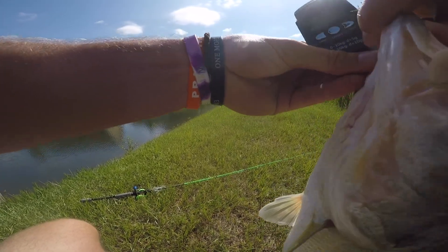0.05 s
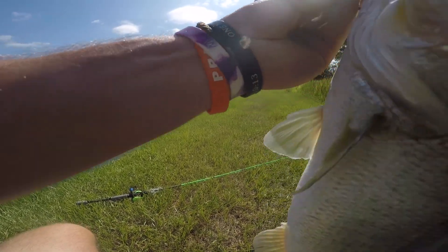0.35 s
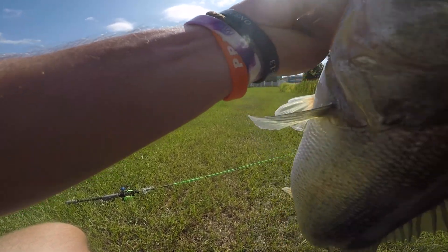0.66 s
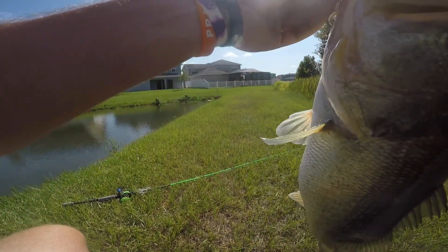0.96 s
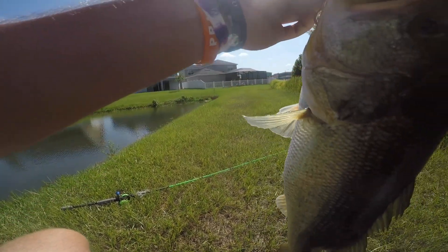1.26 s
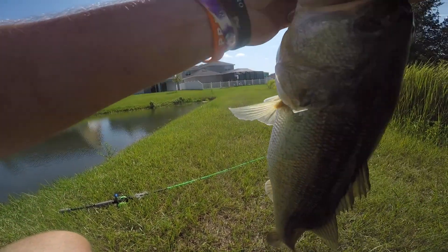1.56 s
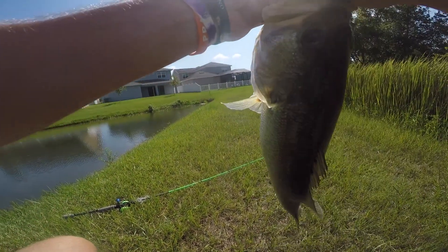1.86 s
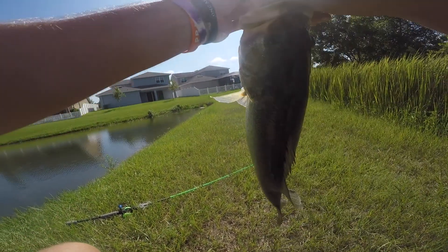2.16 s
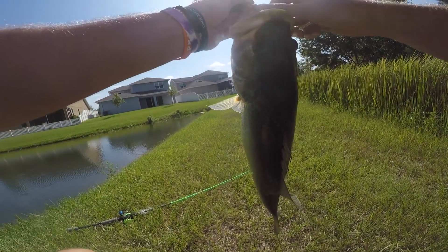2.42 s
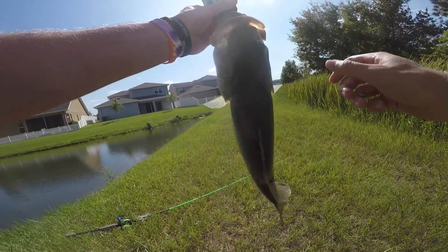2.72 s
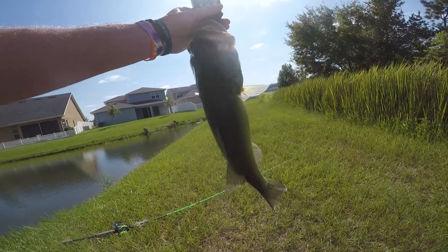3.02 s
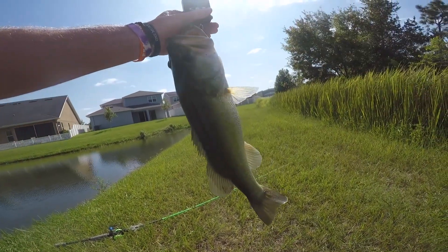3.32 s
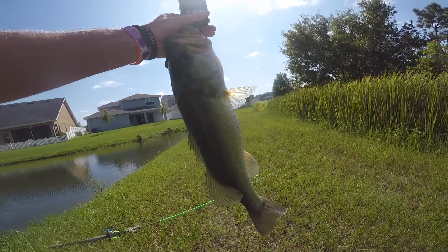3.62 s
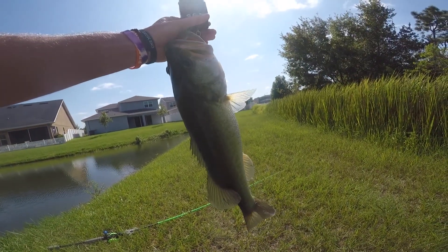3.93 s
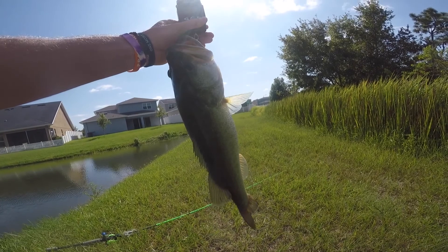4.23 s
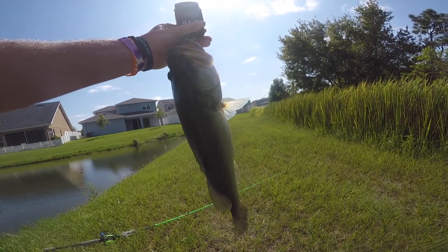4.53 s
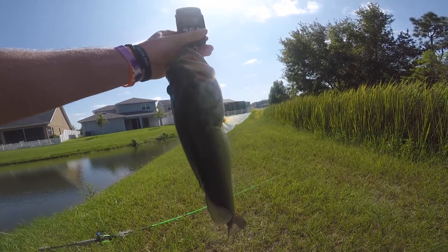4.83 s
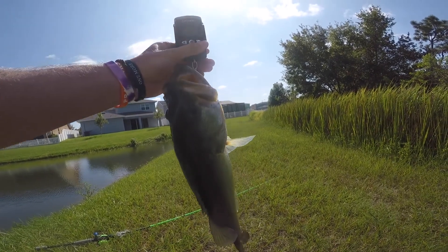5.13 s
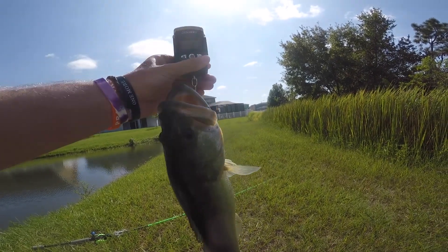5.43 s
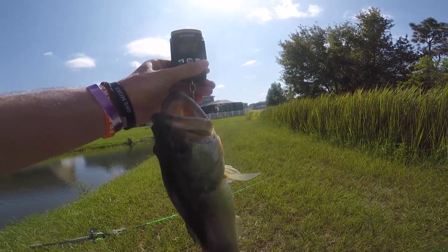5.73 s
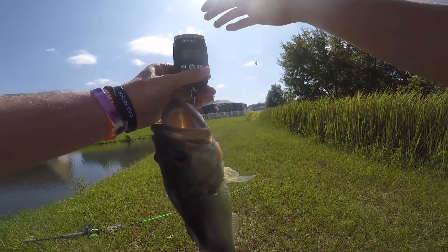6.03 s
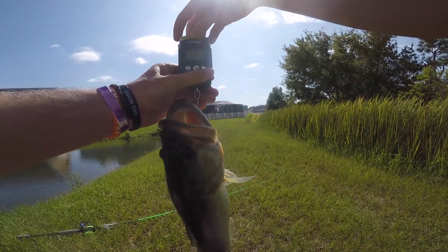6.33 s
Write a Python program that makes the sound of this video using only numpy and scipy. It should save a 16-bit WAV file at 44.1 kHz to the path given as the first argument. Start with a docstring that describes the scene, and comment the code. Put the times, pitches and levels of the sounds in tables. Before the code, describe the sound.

A heartbeat thuds close over low outdoor rumble and hum, with small clicks, strap rubbing, a faint calling bird and one loud bump.

```python
"""Beside a pond, an angler holds out a bass on a hand scale, heard from a camera strapped to the chest.
Heartbeats drive the resonances of the harness, whose straps rub as the arms move; bumps ring the case.
The hook and the wet fish click, and the hook clinks once. Behind lie a low rumble, the hum of air
conditioners at the houses, insects in the reeds and a bird calling in gliding tones."""
import sys
import numpy as np
from scipy import signal
from scipy.fft import rfft, irfft
from scipy.io import wavfile
from scipy.ndimage import uniform_filter1d, minimum_filter1d, map_coordinates

SR = 44100
rng = np.random.default_rng(int(sys.argv[2]) if len(sys.argv) > 2 else 0)


def transcribe(signal):
    """Save signal, clipped to [-1, 1], as a 16-bit WAV file at the path in sys.argv[1]."""
    frames = np.atleast_2d(signal).T
    limited = np.clip(frames, -1, 1)
    pcm = np.round(limited * 32767).astype(np.int16)
    wavfile.write(sys.argv[1], SR, pcm)


N = 285327


def from_db(db):
    """Decibels as an amplitude ratio."""
    return 10 ** (np.asarray(db) / 20)


def rms_one(x):
    """Normalisation to unit rms."""
    return x / np.sqrt(np.mean(x ** 2) + 1e-20)


def at_hz(points, hz):
    """Interpolation on a logarithmic frequency axis."""
    point_hz, values = np.transpose(points)
    return np.interp(np.log(hz + 1e-9), np.log(point_hz), values)


def panned(balance_db):
    """A level difference, left minus right, split between the two microphone ports."""
    return from_db(np.array([[.5], [-.5]]) * balance_db)


def add(out, start_s, sound):
    """Superposition of a stereo sound from a given time."""
    i = max(0, round(start_s * SR))
    out[:, i:i + sound.shape[1]] += sound[:, :out.shape[1] - i]


def drift(per_s):
    """Smooth random modulation of unit rms."""
    knots = rng.standard_normal(2000)
    return rms_one(map_coordinates(knots, [np.arange(N) / SR * per_s], order=2, mode="wrap"))


def noise(colour, channels=1):
    """White noise shaped to a spectral density in dB, fading out below 20 Hz."""
    hz = np.arange(N // 2 + 1) * SR / N
    gain = from_db(at_hz(colour, hz)) * np.sqrt(SR / 2) * np.clip(hz / 10 - 1, 0, 1)
    return irfft(rfft(rng.standard_normal((channels, N))) * gain, N)


def band(x, low_hz, high_hz):
    """A band-pass filter with gentle slopes."""
    return signal.sosfilt(signal.butter(2, [low_hz, high_hz], "band", fs=SR, output="sos"), x)


def decay(t, t60):
    """Exponential damping by 60 dB in t60 seconds."""
    return np.exp(-np.log(1000) * t / t60)


def ring(t, hz, t60, rise_cycles):
    """Free vibration of a damped mode after a soft push at t = 0."""
    t = np.maximum(t, 0)
    return np.sin(2 * np.pi * hz * t) * decay(t, t60) * (1 - np.exp(-(hz * t / rise_cycles) ** 2))


def air(swell_db=1.63):
    """Partial coherence: distant rumble is partly alike at the ports; a faint wash is in antiphase."""
    # Each row of both: frequency in Hz, spectral density in dB.
    rumble_colour = [(20, -32), (35, -42), (60, -44.5), (85, -46.5), (130, -57.5), (220, -66.5),
                     (320, -71.5), (450, -82), (650, -86), (1200, -93.5), (1800, -94.5), (2500, -101),
                     (4300, -96), (12000, -110)]
    wash_colour = [(200, -87), (450, -79.5), (650, -79.5), (860, -77), (1200, -94), (1650, -91),
                   (2050, -104), (3000, -102), (5000, -112)]
    # Each row: frequency in Hz, share of power common to both ports.
    coherence = [(30, 0), (70, 0.21), (140, 0.7), (400, 0.43)]
    # Each row: frequency in Hz, left minus right in dB.
    balance = [(20, 4.5), (45, 2.5), (130, -6), (300, -7.5), (450, -5), (800, -7.5), (14000, 3)]
    hz = np.arange(N // 2 + 1) * SR / N
    spectra = rfft(noise(rumble_colour, channels=3))
    alike = at_hz(coherence, hz)
    pair = np.sqrt(1 - alike) * spectra[:2] + np.sqrt(alike) * spectra[2]
    rumble = irfft(pair * panned(at_hz(balance, hz)), N)
    return rumble * from_db(swell_db * drift(8.5)) + noise(wash_colour) * [[1], [-1]]


def hum(waver_db=2.0, wander_rad=0.62):
    """Moving air modulates the amplitude and phase of compressor and fan tones from across the pond."""
    # Each row: frequency in Hz, left and right levels in dB.
    motor_tones = [(78.97, -34.5, -32.5), (118.14, -41, -39.5), (235.3, -56, -50), (240.9, -55.5, -40.5),
                   (346.5, -88, -49), (403.1, -82, -51)]
    t = np.arange(N) / SR
    out = np.zeros((2, N))
    for hz, left_db, right_db in motor_tones:
        amplitude = np.sqrt(2) * from_db([[left_db], [right_db]]) * from_db(waver_db * drift(5))
        out += amplitude * np.sin(2 * np.pi * hz * t + wander_rad * drift(4))
    return out


def insects(level_db=-5, shimmer_db=4.5, count=36, song_waver_db=1.5, song_wander_rad=.8):
    """Incoherent addition: a far chorus merges into hiss and thin tones; nearer singers stand out."""
    # Each row: frequency in Hz, relative spectral density in dB.
    chorus_colour = [(3000, -110), (4500, -100.5), (5400, -89.5), (6300, -88), (7600, -90), (8500, -92.5),
                     (10300, -95.5), (11400, -106), (12200, -102), (13500, -108), (15000, -120)]
    # Each row of both: time in seconds, relative level in dB.
    hiss_levels = [(0, 1), (1.1, 0.5), (2.2, 0), (3.1, 1), (4.1, 0.8), (5, 0), (6.47, -0.5)]
    tone_levels = [(0, -76), (1, -72.5), (2.2, -73), (3.1, -70.5), (4.3, -73.5), (5.3, -78), (6.47, -79)]
    # Each row: start and length in seconds, pitch in Hz, relative level in dB.
    songs = [(.1, 1.2, 6901, -72), (.5, 1.1, 4694, -76), (.4, 2.6, 7445, -72), (.7, 2, 7730, -75.5),
             (2.4, 1.6, 6342, -70), (2.2, 3, 6085, -69.5)]
    t = np.arange(N) / SR
    wander = np.array([drift(10) for _ in range(5)])
    swells = [from_db(shimmer_db * drift(1.64)) for _ in range(7)]
    pitches = np.linspace(5300, 8300, count) + rng.normal(0, 30, count)
    colour_db = at_hz(chorus_colour, pitches)
    colour_db -= colour_db.max()
    tones = np.zeros((2, N))
    for k, hz in enumerate(pitches):
        amplitude = from_db(colour_db[k] + rng.normal(0, 1, (2, 1))) * swells[k % 7]
        tones += amplitude * np.sin(2 * np.pi * hz * t + .5 * rng.standard_normal(5) @ wander)
    tones *= from_db(np.interp(t, *np.transpose(tone_levels)))
    hiss = from_db(np.interp(t, *np.transpose(hiss_levels))) * noise(chorus_colour, channels=2)
    out = from_db(level_db) * (hiss + tones)
    for s, length_s, hz, song_db in songs:
        amplitude = from_db(song_db + song_waver_db * drift(7.9))
        song = amplitude * np.sin(2 * np.pi * hz * t + song_wander_rad * drift(20))
        swell = signal.windows.tukey(int(length_s * SR), .5)
        add(out, s, swell * song[:len(swell)] * np.ones((2, 1)))
    return out * panned(-6.5)


def strap_motion(creep_db=-53):
    """Powers add: the straps' steady creep plus a bell-shaped swell for each arm stroke."""
    # Each row: time of the peak in seconds, relative level in dB, half length in seconds.
    strokes = [(0.267, -49, 0.1), (0.431, -50, 0.0072), (0.432, -34.5, 0.038), (0.53, -46, 0.045),
               (0.747, -54, 0.022), (1.708, -44, 0.22), (1.833, -37, 0.021), (2.006, -46.5, 0.048),
               (2.863, -44, 0.049), (3.09, -44.5, 0.16), (6.035, -43.5, 0.21), (6.107, -38.5, 0.023),
               (6.42, -47, 0.031)]
    t = np.arange(N) / SR
    stroke_power = sum(from_db(db) ** 2 * np.exp(-2 * np.minimum(np.abs(t - s) / half_s, 10) ** 2)
                       for s, db, half_s in strokes)
    return np.sqrt(from_db(creep_db) ** 2 + stroke_power)


def rubbing(case_db=-25.5, cloth_db=-28.0, hollow_db=-25, catch_db=1.0, flicker_db=3.0):
    """Stick-slip friction of straps on cloth excites the case's hollows and the ports in antiphase."""
    # Sound borne by the case and by the air. Each row: frequency in Hz, relative density in dB.
    case_colour = [(40, 0), (160, 7.5), (230, 7), (320, -1), (450, -9), (680, -15), (860, -2), (980, -8),
                   (1180, -.5), (1650, -15.5), (1930, -6), (2600, -21), (3300, -30), (6000, -48.5)]
    cloth_colour = [(50, 8), (130, 6), (190, 9), (300, 6), (420, -11), (700, -16), (860, -19.5), (980, -19),
                    (1150, -16), (1800, -25), (2500, -21), (3000, -25.5), (3650, -23.5), (4600, -35),
                    (9000, -51.5)]
    # Each row: resonance and bandwidth in Hz, relative density in dB.
    hollows = [(849, 62, -9.5), (1080, 110, -10.5), (1450, 110, -14), (1900, 120, -16), (2480, 210, -10.5),
               (3520, 260, -20.5)]
    effort = strap_motion() * from_db(catch_db * drift(per_s=130))
    case = from_db(case_db) * noise(case_colour) * [[1], [-1]]
    friction = rng.standard_normal(N) * np.sqrt(SR / 2)
    hollow = np.zeros(N)
    for hz, width_hz, db in hollows:
        drive = band(friction, hz / 1.3, hz * 1.3)
        resonance = signal.lfilter(*signal.iirpeak(hz, hz / width_hz, fs=SR), drive)
        hollow += from_db(db + flicker_db * drift(per_s=45)) * resonance
    cloth = from_db(cloth_db) * noise(cloth_colour)
    return effort * (case + cloth + from_db(hollow_db) * hollow)


def wobble(count):
    """Quick random modulation within a note."""
    return map_coordinates(rng.standard_normal(64), [np.arange(count) / SR * 200], order=2, mode="wrap")


def note(hz, jitter=0.01, shimmer_db=2.5):
    """Phase is the integral of frequency; pitch sets the level and phase differences at the ports."""
    # Each row: frequency in Hz, left minus right in dB, left phase lead in radians.
    ports = [(1940, -10.5, 3.96), (2720, -1, 1.06), (3500, -1.5, 1.7)]
    port_hz, balance_db, lead = np.transpose(ports)
    phase = 2 * np.pi * np.cumsum(hz * (1 + jitter * wobble(len(hz)))) / SR
    pair = np.sin([phase + np.interp(hz, port_hz, lead), phase])
    return from_db(shimmer_db * wobble(len(hz))) * pair * panned(np.interp(hz, port_hz, balance_db))


def slur(length_s, top_hz, droop_hz, crest, bend, burr, burr_hz=72.4, swing_hz=150):
    """Frequency and amplitude modulation give a drooping note a burr that clears as it goes."""
    along = np.linspace(0, 1, int(length_s * SR))
    crest = np.clip(crest, 0, .5)
    flutter_hz = burr_hz * (1 + .35 * wobble(len(along)))
    flutter = burr * (1 - along ** 2) * np.sin(2 * np.pi * np.cumsum(flutter_hz) / SR)
    arch_hz = top_hz - droop_hz * np.abs((along - crest) / (1 - crest)) ** bend
    swell = np.abs(np.sin(np.pi * along ** 1.4)) ** 0.55  # peaks after the middle
    return swell * (1 + .5 * flutter) * note(arch_hz + swing_hz * flutter)


def whistle(fall_s, after_s, start_hz, dip_hz, crest_hz, climb_db, attack_s=0.0093, release_s=0.026):
    """A frequency glide: a clear tone scoops up, falls to a dip, climbs to a crest and sags."""
    scoop_hz, sag_hz = 200, 260
    t = np.arange(-fall_s, after_s, 1 / SR)
    contour = [(-fall_s, start_hz - scoop_hz), (-.8 * fall_s, start_hz),
               (-.6 * fall_s, start_hz - (start_hz - dip_hz) / 10), (0, dip_hz),
               (.418 * after_s, crest_hz), (.46 * after_s, crest_hz), (after_s, crest_hz - sag_hz)]
    hz = uniform_filter1d(np.interp(t, *np.transpose(contour)), size=320)
    gate = np.interp(t, [t[0], t[0] + attack_s, t[-1] - release_s, t[-1]], [0, 1, 1, 0])
    level_db = np.interp(t, [-.2 * fall_s, 0.34 * after_s], [0, climb_db])
    return gate * from_db(level_db) * note(hz)


def scatter(x, t60):
    """Diffuse reflection, as convolution with decaying noise of unit energy."""
    t = np.arange(SR // 2) / SR
    response = rms_one(rng.standard_normal((2, len(t))) * decay(t, t60)) / np.sqrt(len(t))
    return signal.fftconvolve(x, response, axes=1)[:, :N]


def bird(reeds_db=-12.5, trees_db=-14):
    """Chirps and two-note calls, scattered by grass and reeds and, for longer, by trees and houses."""
    # A call's first note. Each row: start and length in seconds, top pitch and droop in Hz,
    # bend (1 is straight), level in dB, burr from 0 to 1.
    slurs = [(2.141, 0.069, 2340, 100, 1.7, -56, 0.2), (2.862, 0.054, 2614, 360, 1.1, -44, .4),
             (3.169, 0.069, 2350, 150, 1.7, -45.5, 0.4), (3.465, 0.025, 2155, 80, 2, -40.5, 0.2),
             (3.723, 0.081, 2473, 540, 1.3, -44, 1), (3.933, 0.091, 2053, 330, 4.9, -45.5, 0.4),
             (4.238, 0.1, 2085, 260, 5.3, -42.5, 0.8), (4.85, 0.085, 2095, 200, 3, -44, 0.5),
             (5.46, 0.09, 2190, 378, 2.6, -45.5, 0.8), (5.733, 0.09, 2327, 372, 1.8, -41.5, 1)]
    # Its second note. Each row: time of the dip in seconds, level in dB, fall in seconds, start, dip
    # and crest pitches in Hz, level change over the climb in dB, length after the dip in seconds.
    whistles = [(2.241, -42.5, 0.034, 2830, 2450, 3190, -1.5, 0.05),
                (2.962, -41.5, 0.037, 2900, 2446, 3140, -3, 0.051),
                (3.283, -40, 0.036, 2990, 2590, 3180, -2, 0.052),
                (3.555, -38.5, .03, 3040, 2330, 3250, -9, 0.052),
                (3.851, -40.5, 0.033, 2890, 2280, 3170, -6, 0.034),
                (4.076, -40, 0.026, 2830, 2250, 2950, -1.5, 0.036),
                (4.393, -38.5, 0.029, 3030, 1940, 3130, -13, 0.032),
                (4.978, -39, 0.033, 3100, 2230, 3140, -4, 0.035),
                (5.601, -37, 0.023, 3030, 2200, 3000, -6.5, 0.04),
                (5.887, -39, 0.039, 2850, 2370, 3180, -15, 0.062)]
    # Each row: start and length in seconds, top pitch and droop in Hz, place of the top as a share
    # of the length (capped at half), level in dB, burr from 0 to 1.
    chirps = [(0.012, .03, 3650, 200, 0, -47, 1), (0.017, 0.087, 2900, 40.6, 0.2, -49.5, 1),
              (0.579, 0.045, 3860, 700, 0.16, -49.5, 0.9), (0.707, .03, 3600, 150, 0.5, -52, 0.3),
              (1.31, 0.027, 3350, 800, 0.1, -51, 0.4), (1.375, 0.056, 3250, 650, 0.4, -47.5, 0.1),
              (1.779, 0.018, 3630, 750, 0.1, -47, .1), (1.849, 0.067, 3390, 836, 0.53, -46, 0.1),
              (3.156, 0.015, 4050, 700, 0.1, -51, .5), (3.394, 0.02, 4600, 1210, 0.06, -47, 0.9),
              (4.492, .035, 5050, 500, 0.1, -53, 0.9), (6.305, 0.081, 2070, 333, 0.08, -52, 0.4)]
    out = np.zeros((2, N))
    for s, length_s, top_hz, droop_hz, bend, level_db, burr in slurs:
        add(out, s, from_db(level_db) * slur(length_s, top_hz, droop_hz, 0, bend, burr))
    for s, level_db, fall_s, start_hz, dip_hz, crest_hz, climb_db, after_s in whistles:
        glide = whistle(fall_s, after_s, start_hz, dip_hz, crest_hz, climb_db)
        add(out, s - fall_s, from_db(level_db) * glide)
    for s, length_s, top_hz, droop_hz, crest, level_db, burr in chirps:
        add(out, s, from_db(level_db) * slur(length_s, top_hz, droop_hz, crest, 1.7, burr))
    return out + from_db(reeds_db) * scatter(out, t60=.05) + from_db(trees_db) * scatter(out, t60=.19)


def clicks(level_db=-5, rise_s=0.00039, top_db=-15, crack_t60=0.0025):
    """Brief transients are broadband: hook, gills and fins snap with a crack, crackle and duller body."""
    # Each row: start in seconds, relative level in dB, left minus right in dB, body gain in dB,
    # body frequency in Hz, t60 in seconds, crack gain in dB.
    snaps = [(.1312, -28.5, -17, -4, 4300, 0.0087, -20), (.1718, -24, -5, 2, 3440, 0.011, -6),
             (.736, -25, -10, -20, 4200, 0.011, -16), (1.267, -25, -3, -4, 3670, .012, -14),
             (1.3357, -24.5, -4, -4, 4200, .008, -20), (1.4838, -19, -2, -4, 3800, 0.017, -15),
             (1.4897, -28, -2, -6, 3800, 0.02, -20), (1.4934, -16, -1, 0, 2400, 0.014, -9),
             (1.4965, -19.5, 1, -7, 2500, .012, -20), (1.5025, -26, 8, -2, 3270, 0.022, -18),
             (1.507, -24, 3, -5, 3300, 0.017, -20), (1.686, -26, -4, -10, 3600, .02, -20),
             (1.696, -31, -3, 3, 3600, .014, -20), (2.8518, -29, -8, -6, 4000, .0097, -20)]
    out, t = np.zeros((2, N)), np.arange(SR // 10) / SR
    for s, snap_db, pan_db, body_db, body_hz, t60, crack_db in snaps:
        grains = rng.standard_normal((4, len(t)))
        grains = grains[0] + grains[1:3]  # a common part plus one for each port
        crackle = grains * decay(t, t60) * (1 - np.exp(-t / rise_s))
        body = from_db(body_db) * band(crackle, body_hz / 1.35, body_hz * 1.35)
        bright = band(crackle, 5300, 7300)
        top = from_db(top_db) * band(crackle, 7500, 10000)
        crack = from_db(crack_db) * band(grains * decay(t, crack_t60), 8000, 15000) / 2
        add(out, s, from_db(snap_db + level_db) * (bright - body - top + crack) * panned(pan_db))
    return out


def heartbeat(left_db=-2.0, right_db=-19, dub_s=.205, dub_db=-3.5, surge_s=0.04735, surge=0.51):
    """Modal response: each push of the chest wall, and the surge after it, sets the harness swaying."""
    # Each row: start in seconds, relative level in dB.
    beats = [(.178, 2), (0.737, 1), (1.228, 0), (1.768, 0.5), (2.285, 0), (2.89, 1.5), (3.435, 0.5),
             (3.955, 1), (4.485, 3), (5.06, 1.5), (5.59, 4), (6.11, 2.5)]
    # Each row: frequency in Hz, relative level in dB, t60 in seconds.
    harness_modes = [(22, -6.5, .28), (36, -5, .18), (57, -8, .12), (80, -10, .10), (102, -18, .08)]
    out, t = np.zeros((2, N + SR)), np.arange(SR // 2) / SR
    port_gains = from_db([[left_db], [right_db]])
    for s, beat_db in beats:
        for after_s, sound_db in ((0, 0), (dub_s, dub_db)):  # first and second heart sounds
            gain = from_db(beat_db + sound_db + rng.normal(0, 1.04))
            for delay_s, push in ((0, 1), (surge_s, surge)):
                sway = np.zeros(len(t))
                for k, (hz, db, t60) in enumerate(harness_modes):
                    detuned_hz = hz * from_db(rng.normal(0, 0.35))
                    sway += (-1) ** k * from_db(db) * ring(t, detuned_hz, t60, rise_cycles=0.52)
                add(out, s + after_s + delay_s, push * gain * sway * port_gains)
    return out[:, :N]


def knocks():
    """Blunt impacts excite damped modes: the camera case rings first, its mount follows."""
    # Each row: start in seconds, relative force in dB.
    bumps = [(.756, -24), (5.8727, 7)]
    # Each row: frequency in Hz, left and right gains in dB, t60 and delay in seconds, left lag in radians.
    case_modes = [(123, 6, -24, .034, .0082, -2.4), (212, 1, 3, .039, .00203, 1.1),
                  (347, -17, 1, .03, .00083, -1.3), (435, -9, -9, .025, .00029, 7.8),
                  (870, -11, -10, .043, .00038, 2.4), (1122, -8, -9.5, .025, .00044, 2.9),
                  (1554, -14, -13, .009, .00034, 3.7)]
    out, t = np.zeros((2, N)), np.arange(SR // 5) / SR
    for s, force_db in bumps:
        for hz, left_db, right_db, t60, delay_s, left_lag in case_modes:
            port_t = t - delay_s - np.array([[left_lag], [0]]) / (2 * np.pi * hz)
            gains = from_db(force_db) * from_db([[left_db], [right_db]])
            add(out, s, gains * ring(port_t, hz, t60, rise_cycles=0.8))
    return out


def clink(start_s=1.001):
    """Damped vibration: the scale's metal hook shifts and rings briefly, deadened by the fish."""
    # Each row: frequency in Hz, level in dB, t60 in seconds.
    hook_modes = [(2550, -42, 0.029), (3700, -48, .035)]
    out, t = np.zeros((2, N)), np.arange(SR // 5) / SR
    ringing = sum(from_db(db) * ring(t, hz, t60, rise_cycles=1.8) for hz, db, t60 in hook_modes)
    add(out, start_s, ringing * np.ones((2, 1)))
    return out


def scene():
    """Superposition of close body and handling sounds with the pond behind."""
    return heartbeat() + rubbing() + clicks() + clink() + knocks() + bird() + hum() + air() + insects()


def record(dry, ceiling_db=-.7, release_db_per_s=80, cutoff_hz=15100):
    """Look-ahead limiting lowers the gain around peaks over the ceiling; a low-pass cuts the top."""
    peak_db = 20 * np.log10(np.abs(dry).max(axis=0) + 1e-9)
    over_db = np.maximum(peak_db - ceiling_db, 0)
    ramp = release_db_per_s * np.arange(N) / SR
    held_db = np.maximum.accumulate(over_db + ramp) - ramp
    gain_db = uniform_filter1d(minimum_filter1d(-held_db, size=300), size=300)
    low_pass = signal.cheby2(20, 60, cutoff_hz, fs=SR, output="sos")
    return signal.sosfilt(low_pass, dry * from_db(gain_db))


dry = scene()
out = record(dry)
transcribe(out)
```